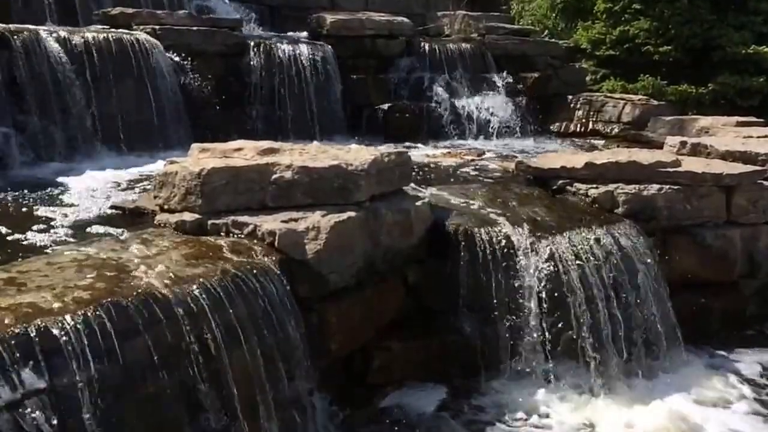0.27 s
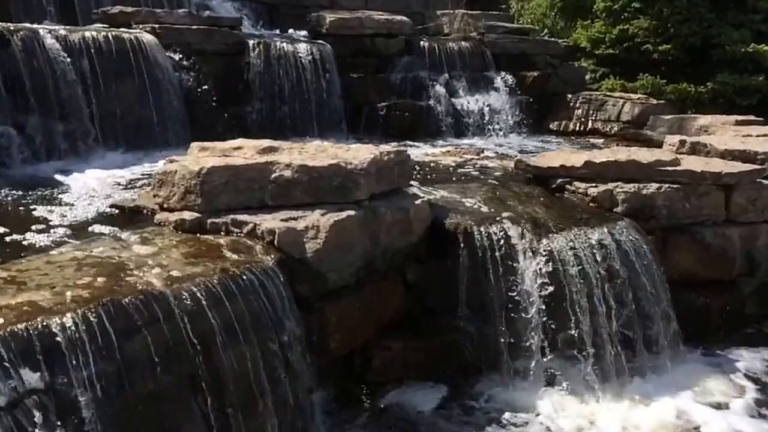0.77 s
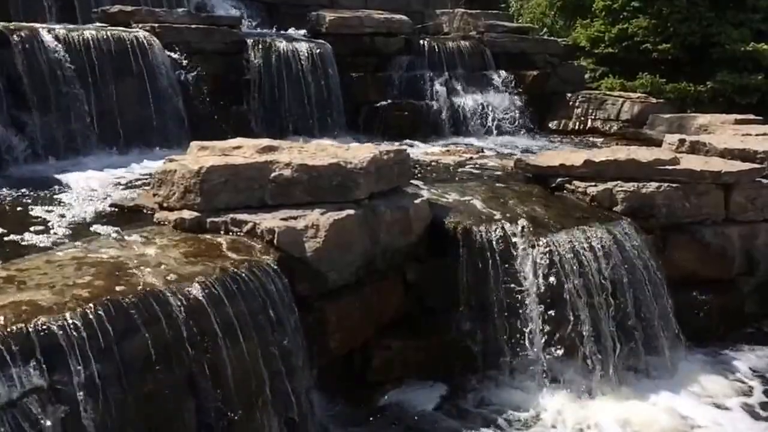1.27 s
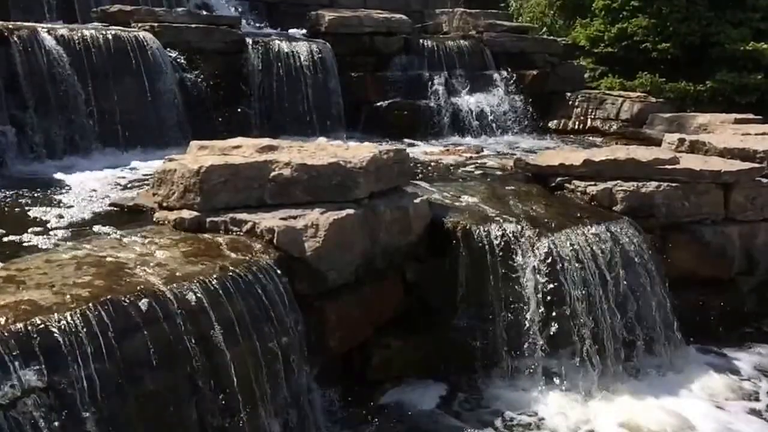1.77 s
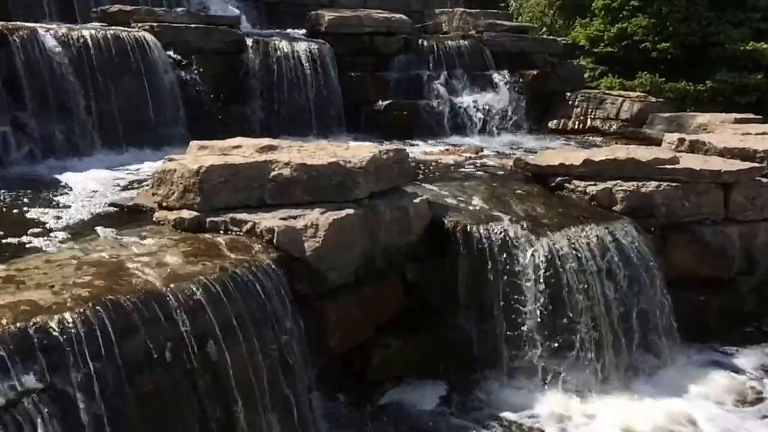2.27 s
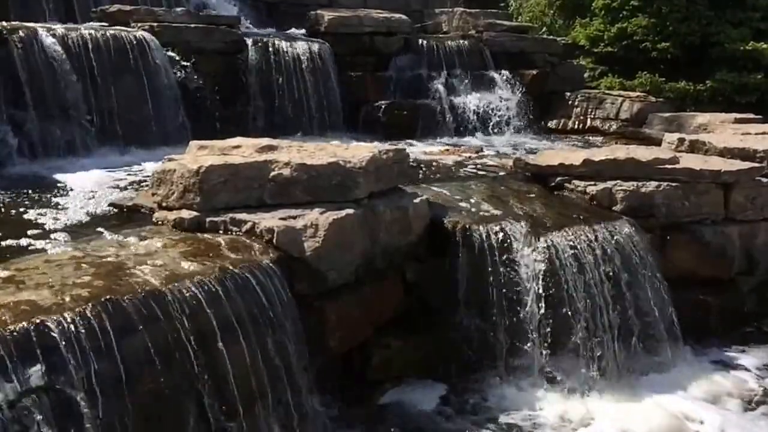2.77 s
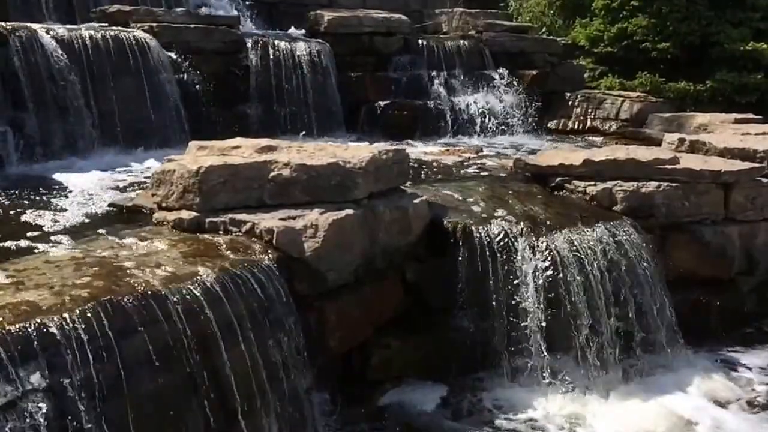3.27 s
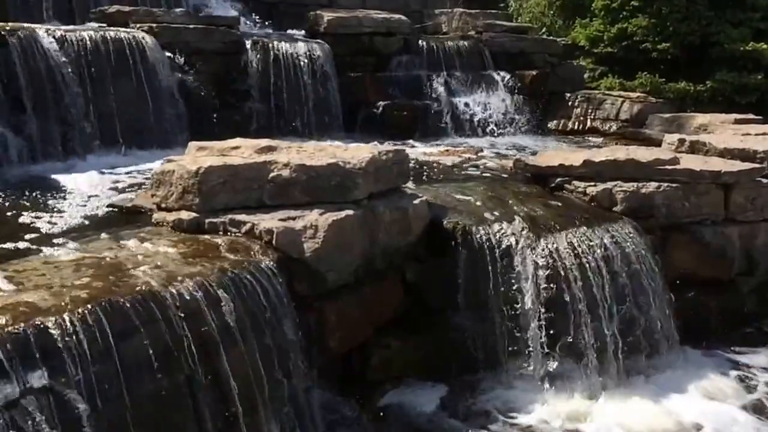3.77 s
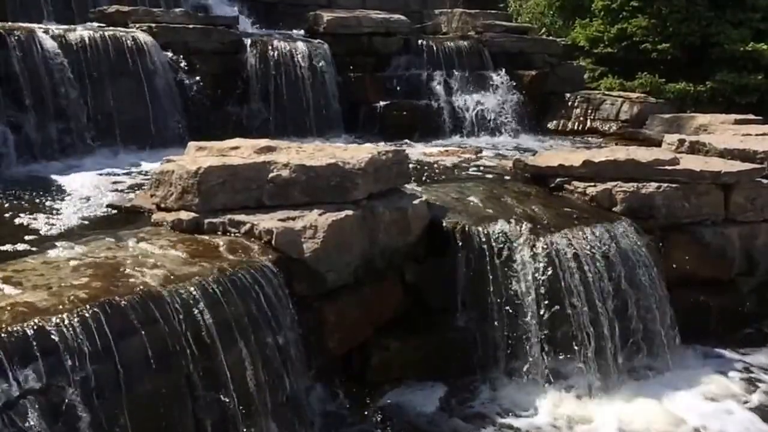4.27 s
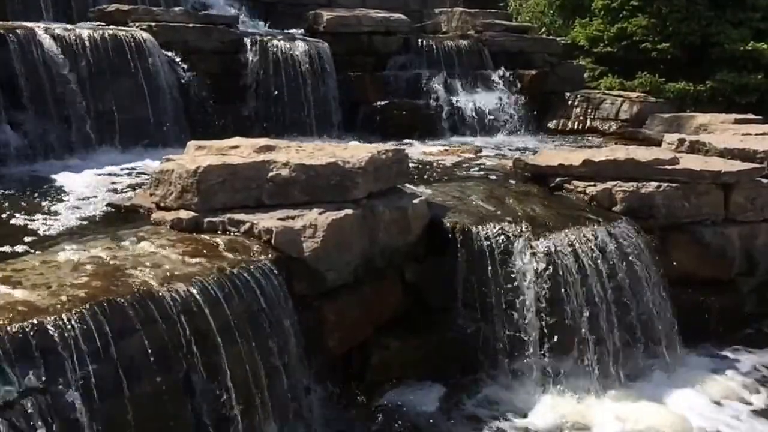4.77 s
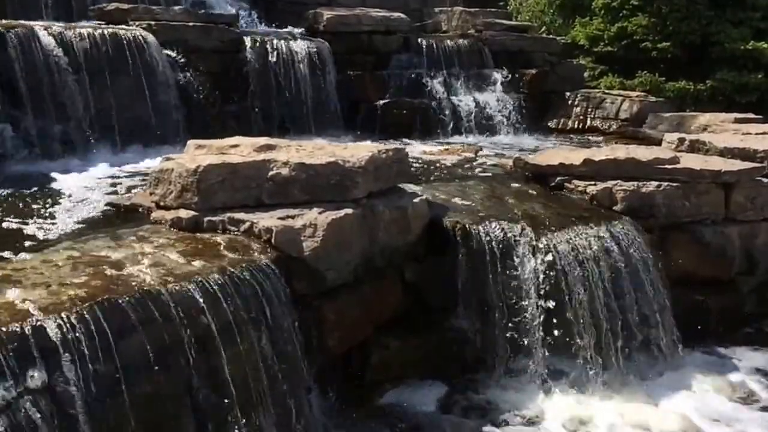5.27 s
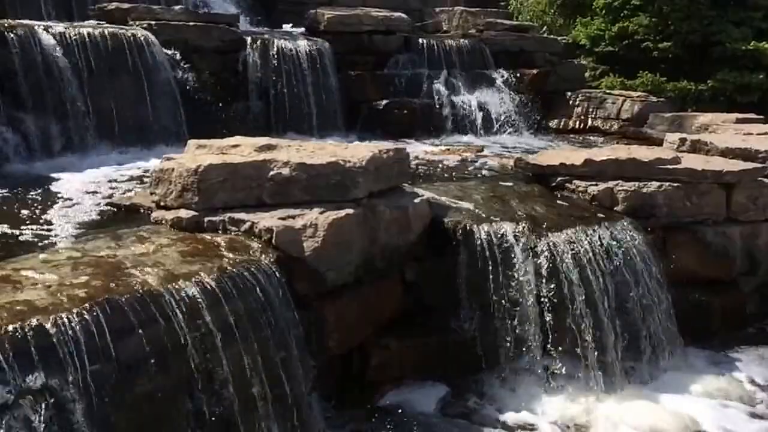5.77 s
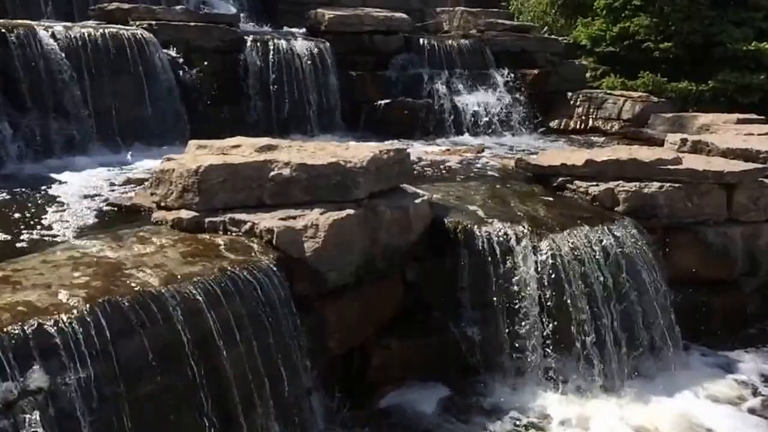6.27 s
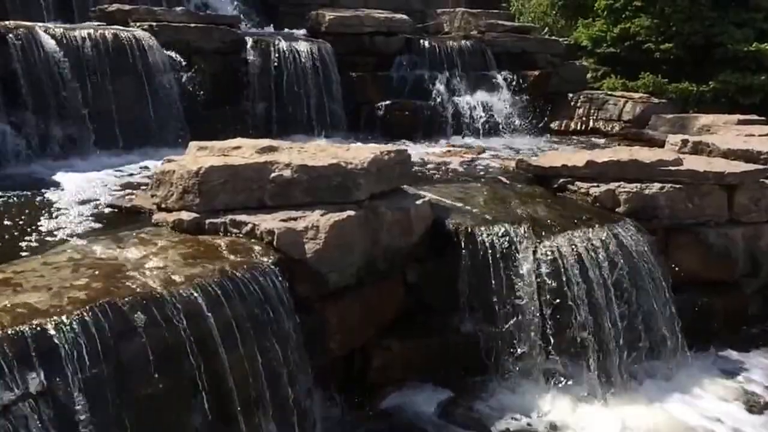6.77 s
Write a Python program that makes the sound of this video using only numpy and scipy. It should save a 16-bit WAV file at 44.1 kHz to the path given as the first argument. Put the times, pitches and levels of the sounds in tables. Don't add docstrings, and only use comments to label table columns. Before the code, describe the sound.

Water falling over stone ledges into a foaming pool, heard close on a phone microphone, identical on both sides. At first it is slowed to quarter speed: a quiet, dark, muffled rumble. After four and a half seconds it dips, climbs in pitch through quick spliced steps with tiny clicks, and bursts into a louder, steady, bright roar and spray hiss until the end.

```python
import sys
import numpy as np
from scipy import signal
from scipy.fft import rfft, irfft, next_fast_len
from scipy.io import wavfile
from scipy.ndimage import uniform_filter1d, map_coordinates

SR = 44100
rng = np.random.default_rng(int(sys.argv[2]) if len(sys.argv) > 2 else 0)


def to_wav(s):
    ch = np.atleast_2d(s).T
    pcm = np.round(np.clip(ch, -1, 1) * 32767)
    wavfile.write(sys.argv[1], SR, pcm.astype(np.int16))


def invert_db(level):
    return 10 ** (np.asarray(level, dtype=float) / 20)


N = 310023


def unit(x):
    return x / np.sqrt(np.mean(x ** 2) + 1e-20)


def coloured(x, spectrum):
    top_hz = 15290
    hz = np.fft.rfftfreq(len(x), 1 / SR)
    point_hz, point_db = np.transpose(spectrum)
    gain_db = np.interp(np.log(hz + 1), np.log(point_hz + 1), point_db)
    return unit(irfft(rfft(x) * invert_db(gain_db) * (hz < top_hz), len(x)))


def wobble(rate):
    points = rng.standard_normal(int(N * rate / SR) + 4)
    return map_coordinates(points, [np.arange(N) * rate / SR])


def churn(patchy_db, flicker_db, surge_db):
    z = signal.stft(rng.standard_normal(N), nperseg=256)[2]
    patches = uniform_filter1d(rng.standard_normal(z.shape), size=5, axis=0)
    patches = uniform_filter1d(patches, size=10, axis=1)
    noise = signal.istft(z * invert_db(patchy_db * unit(patches)), nperseg=256)[1][:N]
    return unit(noise * invert_db(flicker_db * wobble(90) + surge_db))


def bubbles(hz, spread, cycles, scatter_db, count, size):
    draw = rng.random((count, 3))
    pitch = hz * np.exp(spread * rng.standard_normal((count, 1)))
    turns = np.arange(size) / SR * pitch
    ring = np.sin(2 * np.pi * turns * (1 + .12 * turns / cycles))
    ring = ring * np.exp(-3 * turns / cycles) * (1 - np.exp(-2 * turns))
    loudness = invert_db(-scatter_db * np.log(draw[:, 1:2] + 0.0011))
    ring = ring * loudness * np.sqrt(pitch)
    at = (draw[:, :1] * N).astype(int) + np.arange(size)
    return unit(np.bincount(at.ravel(), ring.ravel(), N + size)[:N])


def pool_boom(surge_db):
    # pitch_hz, level_db
    pool_tone = [(18, -47), (30, -23.5), (40, -11), (59, -5.5), (178, 0), (288, -5), (325, -3),
                 (430, -13.5), (560, -38), (950, -120)]
    return coloured(churn(patchy_db=0.37, flicker_db=-0.05, surge_db=surge_db), pool_tone)


def spray_hiss(surge_db):
    # pitch_hz, level_db
    spray_tone = [(2300, -29), (3300, -10), (4300, -4.5), (5600, -2.5), (7500, -2), (9500, -3), (11000, -3),
                  (12200, -4.5), (13200, -5), (14200, -6), (15200, -6.5)]
    fizz = bubbles(hz=7500, spread=0.38, cycles=3, scatter_db=3, count=30000, size=48)
    spray = churn(patchy_db=0.88, flicker_db=.5, surge_db=surge_db)
    return coloured(spray + invert_db(-10) * fizz, spray_tone)


def sheet_roar(surge_db):
    # pitch_hz, level_db
    sheet_tone = [(240, -33.5), (400, -7), (446, -6.5), (502, 0), (577, -2), (936, 0), (1210, -4.5),
                  (1490, -3.5), (1680, -5), (2230, -3.5), (3200, -4.5), (4200, -6.5), (5600, -17),
                  (9350, -60)]
    gurgle = bubbles(hz=1477, spread=0.694, cycles=7.2, scatter_db=2.5, count=9000, size=400)
    sheets = churn(patchy_db=0.7, flicker_db=0.2, surge_db=surge_db)
    return coloured(sheets + invert_db(-15.5) * gurgle, sheet_tone)


def falls():
    surge_db = 0.37 * wobble(11) + .5 * wobble(40)
    return np.array([invert_db(-3.5) * pool_boom(surge_db), sheet_roar(surge_db), spray_hiss(surge_db)])


def slowed(live):
    # start_s, speed (1 = real time), fade_s
    pieces = [
        (0, .2502, .006),
        (4.579, .376, .006),
        (4.672, .511, .012),
        (4.740, .654, .006),
        (4.787, .751, .012),
        (4.818, 1.021, .008),
        (4.905, 1, .006),
    ]
    t, out, used = np.arange(N) / SR, np.zeros_like(live), 0
    ends = [start + fade for start, _, fade in pieces[1:]] + [N / SR]
    for (start, speed, fade), end in zip(pieces, ends):
        first = round(start * SR)
        length = next_fast_len(round((end - start) * SR) + 4096)
        taken = round(length * speed)
        stretched = signal.resample(live[:, used:used + taken], length, axis=1)
        piece = stretched[:, 2048:][:, :N - first]
        used += taken
        rise = np.clip((t[first:] - start) / fade, 0, 1) if start else np.ones(N)
        out[:, first:] *= np.cos(rise * np.pi / 2)
        out[:, first:first + piece.shape[1]] += piece * np.sin(rise[:piece.shape[1]] * np.pi / 2)
    return out


def flow_swing():
    # start_s, flow_db
    water_flow = [(0, -0.5), (.7, 0.7), (1.3, -1), (1.65, -0.5), (2.3, -1.5), (2.75, 0), (3.3, -1),
                  (3.9, .5), (4.5, 0.5), (5.1, 0), (5.35, 0.5), (5.6, 0), (5.9, 0.7), (6.5, -1), (6.7, .5),
                  (7.03, 1)]
    swing_shares = [1.01, .15, .1]
    flow_db = np.interp(np.arange(N) / SR, *np.transpose(water_flow))
    return invert_db(np.outer(swing_shares, flow_db))


def volume():
    # time_s, depth_db
    join_dips = [
        (4.797, 2),
        (4.898, 2.5),
    ]
    slow_db, ducked_db, sagged_db, risen_db, full_db = -38.5, -42.5, -45, -28.5, -26.5
    duck_s, duck_fall_s, dip_s = 4.575, 0.013, 0.0063
    rise_s, rise_length_s, full_s, full_step_s = 4.808, 0.077, 4.902, .01
    t = np.arange(N) / SR
    quiet_db = np.interp(t, [duck_s, duck_s + duck_fall_s, rise_s], [slow_db, ducked_db, sagged_db])
    open_times = [rise_s, rise_s + rise_length_s, full_s, full_s + full_step_s]
    opened = np.interp(t, open_times, invert_db([sagged_db, risen_db, risen_db, full_db]))
    dips_db = sum(db * np.exp(-((t - s) / dip_s) ** 2) for s, db in join_dips)
    return np.where(t < rise_s, invert_db(quiet_db), opened) * invert_db(-dips_db)


def ticks():
    # time_s, peak_db, top_hz
    splice_ticks = [
        (4.585, -50, 7300),
        (4.685, -45, 10000),
        (4.789, -56, 14000),
        (4.801, -46, 14800),
    ]
    t = np.arange(N) / SR
    return sum(invert_db(db) * np.sinc(2 * hz * (t - s)) * np.exp(-((t - s) / .001) ** 2)
               for s, db, hz in splice_ticks)


def gapped(x):
    # pitch_hz, share
    treble_gaps = [(5000, 0), (9000, .008), (12000, .025), (13500, .13), (15000, .11)]
    hz, _, z = signal.stft(x, SR, nperseg=2048, noverlap=1536)
    cells = rng.random(z.shape).repeat(5, axis=0).repeat(4, axis=1)
    cells = cells[:z.shape[0], :z.shape[1]]
    heard = cells >= np.interp(hz, *np.transpose(treble_gaps))[:, None]
    return signal.istft(z * heard, nperseg=2048, noverlap=1536)[1][:N]


def scene():
    layers = flow_swing() * slowed(falls())
    water = volume() * np.sum(layers, axis=0) + ticks()
    return np.array([water, water])


def top_cut(x):
    return signal.sosfilt(signal.butter(12, 16470, fs=SR, output="sos"), x)


def record(dry):
    mono = gapped(dry[0]) + invert_db(-102.5) * rng.standard_normal(N)
    return top_cut(np.array([mono, mono]))


dry = scene()
out = record(dry)
to_wav(out)
```